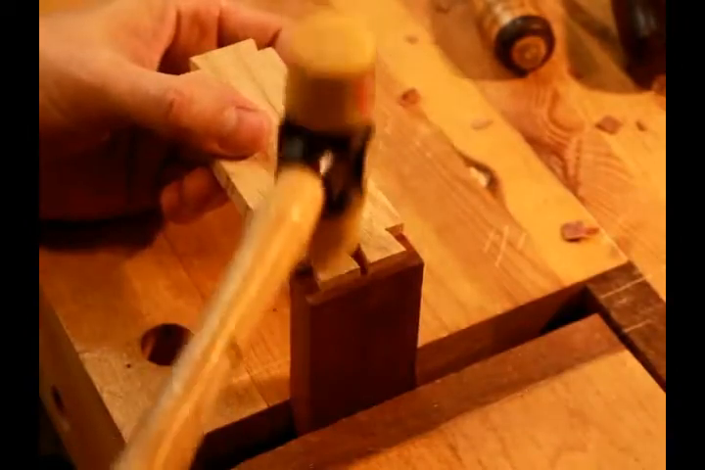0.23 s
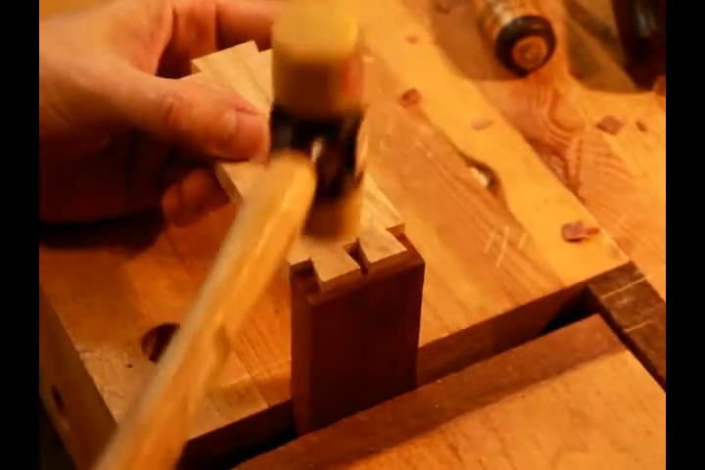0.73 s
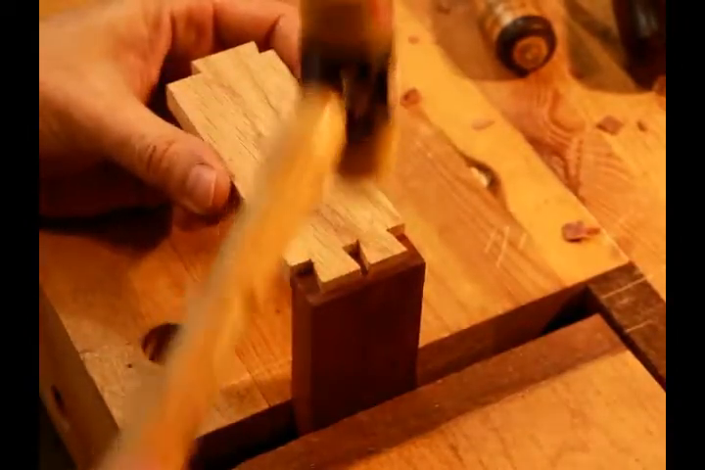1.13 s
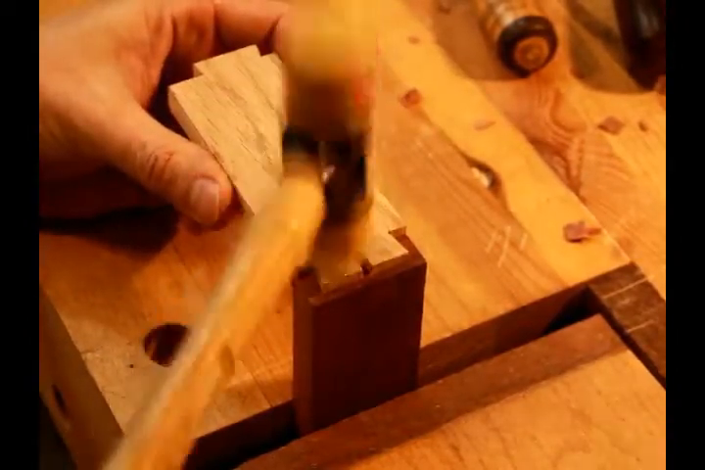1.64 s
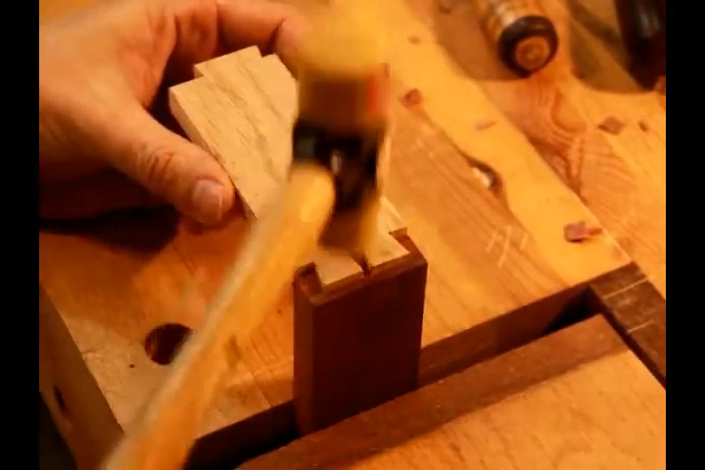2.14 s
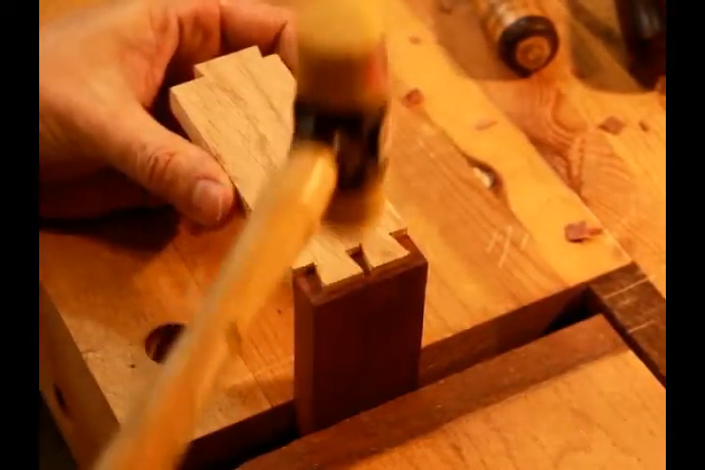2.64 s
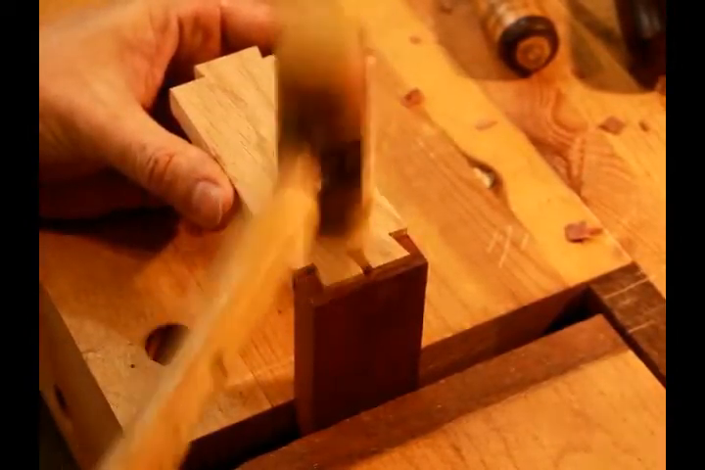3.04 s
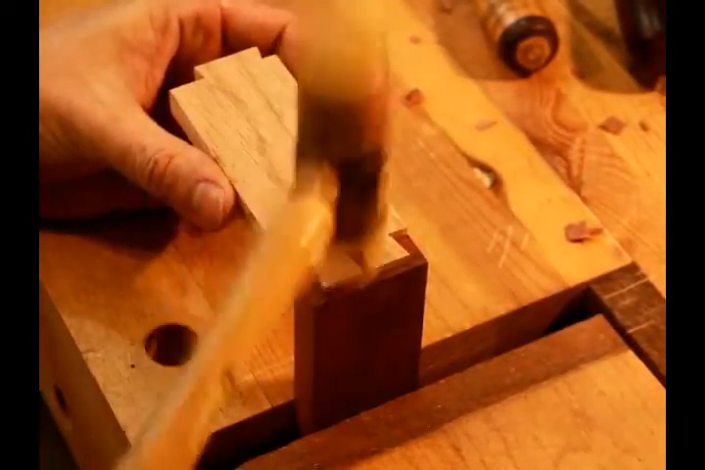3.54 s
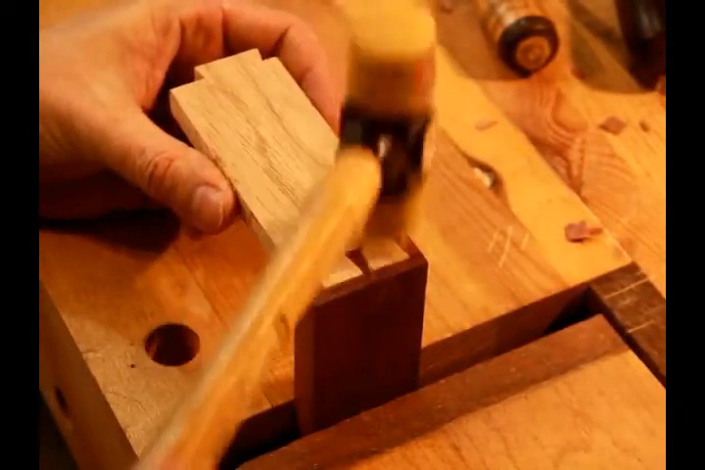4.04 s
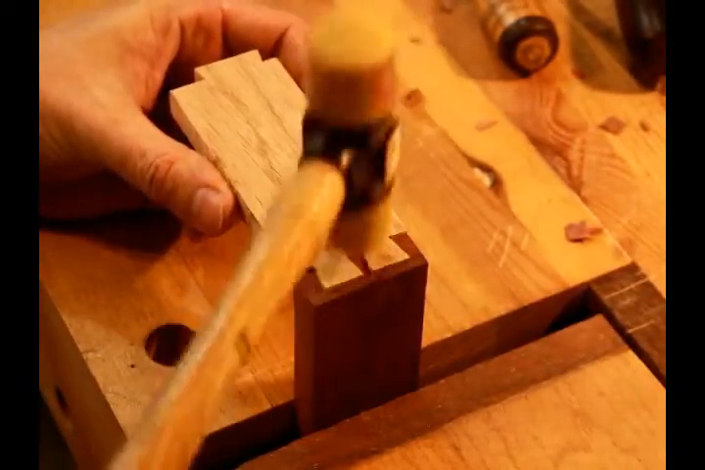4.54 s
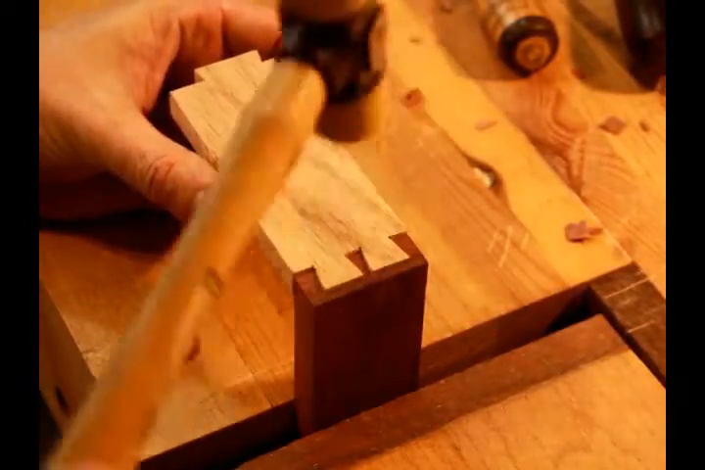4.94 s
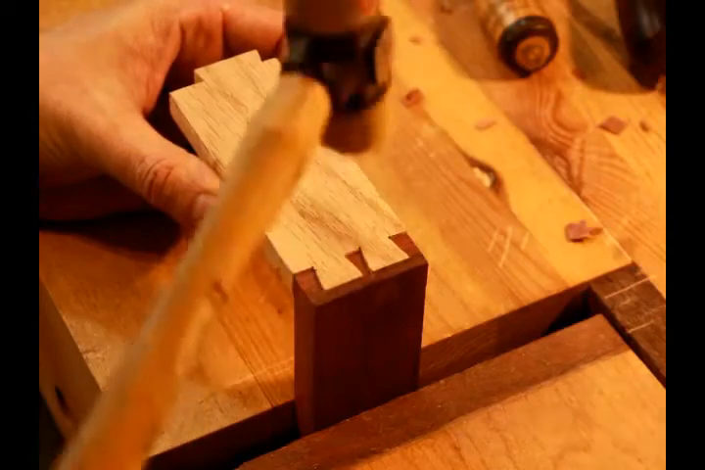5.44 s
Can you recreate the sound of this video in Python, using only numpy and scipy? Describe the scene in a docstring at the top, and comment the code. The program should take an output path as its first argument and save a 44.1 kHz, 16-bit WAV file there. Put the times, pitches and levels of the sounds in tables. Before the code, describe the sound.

Steady mallet taps on wood, about four a second, start light and get harder, with a bench thud and a short room echo.

```python
"""Over a faint room hush, a small mallet taps at a dovetail joint, about four blows a second.
Each blow cracks on the board, rings it briefly and shakes the workbench through the vice;
a small workshop answers every one with the same short, dense echo.
The taps start light and grow firmer. As the joint tightens, it damps the board's twisting ring
and passes more of the knock on to the bench; this peaks at 3.5 s, then eases."""
import sys
import numpy as np
from scipy import signal
from scipy.fft import rfft, irfft
from scipy.io import wavfile
from scipy.ndimage import uniform_filter1d

SR = 44100
rng = np.random.default_rng(int(sys.argv[2]) if len(sys.argv) > 2 else 0)


def materialize(psi):
    """Save the field psi as 16-bit PCM at rate SR to the path in sys.argv[1].

    A 1-D psi becomes a single channel; in a 2-D psi each row is a channel.
    """
    bounded = np.clip(np.atleast_2d(psi).T, -1, 1)
    quanta = np.round(bounded * 32767).astype(np.int16)
    wavfile.write(sys.argv[1], SR, quanta)


N = 251370


def from_db(db):
    """Decibels to gain."""
    return 10 ** (np.asarray(db) / 20)


def curve_at(points, hz):
    """Reads a curve of (Hz, value) points, joined by straight lines over log frequency."""
    point_hz, value = np.transpose(points)
    return np.interp(np.log(hz + 1), np.log(point_hz + 1), value)


def unit_energy(sound):
    """Scales a sound to energy 1."""
    return sound / np.linalg.norm(sound)


def smooth_noise(count, span):
    """A random curve of standard deviation 1, smoothed twice over span points."""
    curve = uniform_filter1d(uniform_filter1d(rng.standard_normal(count), span), span)
    return curve / curve.std()


def minimum_phase(gain):
    """The spectrum of the quickest pulse that has this gain at each frequency."""
    mirrored = np.r_[gain, gain[-2:0:-1]]
    log_gain = np.log(np.maximum(mirrored, from_db(-100)))
    return np.exp(np.conj(signal.hilbert(log_gain)))[:len(gain)]


def add(mix, start_s, sound):
    """Mixes in a sound, which may have begun before time zero."""
    start = round(start_s * SR)
    sound = sound[max(-start, 0):]
    part = mix[max(start, 0):][:len(sound)]
    part += sound[:len(part)]


def room_hush(level_db=-86):
    """A faint, steady bed of room noise, mostly bass."""
    # The colour of the hush. Each row: frequency in Hz, relative level in dB.
    colour = [(20, -20.5), (60, 10.5), (150, -5), (400, -26), (1000, -17.5), (4000, -35.5), (16000, -23.5)]
    gain = from_db(curve_at(colour, np.fft.rfftfreq(N, 1 / SR)))
    noise = irfft(rfft(rng.standard_normal(N)) * gain, N)
    return from_db(level_db) * noise / noise.std()


def mallet_crack(crack_db, tilt_db, modes, ripple_db=1.8, lag_s=0.00053, scatter_s=0.0006, size=2048):
    """Mallet meets board: a broad crack plus hand-damped modes, smeared over about a millisecond."""
    # The colour of the bare contact. Each row: frequency in Hz, relative level in dB.
    colour = [(30, -18), (120, -14.5), (210, 1.5), (390, 4), (650, 3), (1000, -5.5), (1600, 0.5),
              (2300, -6), (3300, -7), (4500, -8.5), (6500, -8.5), (9000, -20), (12000, -23.5),
              (15000, -34.5)]
    hz = np.fft.rfftfreq(size, 1 / SR)
    octaves = np.log2(np.maximum(hz, 1000) / 4000)  # the tilt pivots at 4 kHz, flat below 1 kHz
    ripple = ripple_db * smooth_noise(len(hz), 12)  # many small resonances shift with the landing spot
    power = from_db(curve_at(colour, hz) + crack_db + tilt_db * octaves + ripple) ** 2
    for centre_hz, width_hz, db in modes:
        power += from_db(db) ** 2 / (1 + (1.585 * (hz - centre_hz) / width_hz) ** 2) ** 2
    # Fibres give way unevenly, so each frequency leaves at its own moment.
    delay_s = lag_s + scatter_s * np.tanh(2 * smooth_noise(len(hz), 30))
    scatter = np.exp(-2j * np.pi * np.cumsum(delay_s) * hz[1])
    crack = irfft(minimum_phase(np.sqrt(power)) * scatter)
    return np.fft.fftshift(crack)  # the hit sits mid-buffer


def wood_ring(tightness, force_db, tilt_db, bend_db, bend_hz, mallet_db, spot_db=1.5):
    """The modes one blow wakes in board and mallet. Each row: pitch in Hz, width in Hz, level in dB."""
    # The board's steady modes. Each row: pitch in Hz, width in Hz, base level in dB,
    # dB gained per dB of force, dB gained per dB of bending.
    board_modes = [(1035, 230, -6.5, -0.43, 0.4758), (1850, 315, -5, 0.3, .5), (4256, 340, 6.5, 1, -0.12),
                   (6700, 950, -12, .5, .5), (9640, 550, -12.5, 1.2, 0.67), (12100, 2200, -11.5, 3.5, .1)]
    # The landing spot changes how strongly each one answers.
    steady = [(hz, width, db + by_force * force_db + by_bend * bend_db + spot_db * rng.standard_normal())
              for hz, width, db, by_force, by_bend in board_modes]
    bending = (bend_hz, 330, bend_db)
    # A sharp blow also twists the board, about an octave up; a tighter joint damps that ring.
    twist_db = -3 + 5 * tilt_db + 0.63 * bend_db - 19.5 * tightness
    twisting = (2.05 * bend_hz, 866, twist_db)
    mallet_head = (8090, 810, mallet_db)
    return [bending, twisting, mallet_head] + steady


def bench_shake(tightness, force_db, tilt_db, rise_s=0.0016, split_hz=560):
    """The heavy bench swells into its modes: a thud from the low ones, a knock from the upper ones."""
    # Modes of the bench and clamped board. Each row: pitch in Hz, relative level in dB, T60 in seconds.
    bench_modes = [(80, -1, 0.3), (99, -5, 0.41), (153, 13, 0.36), (178, 2, 0.31), (205, 9, 0.34),
                   (250, 13, 0.41), (273, 22, 0.23), (294, 13, 0.3), (307, -2, 0.48), (339, 25, 0.28),
                   (374, 11, 0.29), (404, 17, 0.26), (439, 9, 0.46), (470, 26, 0.07), (487, 16, 0.27),
                   (500, 0, 0.46), (521, 17, 0.32), (550, 3, 0.36), (576, 8, 0.35), (600, 9, 0.28),
                   (668, 20, 0.17), (703, 0, 0.43), (742, 8, 0.39), (770, 16, 0.18), (832, 11, 0.25),
                   (866, 9, 0.27), (908, -1, 0.52), (947, 15, 0.23), (994, 11, 0.25), (1026, 1, 0.35)]
    # Firm blows bring out the upper modes. Each row: force in dB, base knock level in dB.
    knock_by_force = [(-19, -25.5), (-2.5, -19.5), (-7, -13.5), (1, -6.5), (-1.5, -4.5), (2.5, -3.5)]
    t = np.arange(SR // 2) / SR
    hz, db, t60 = np.transpose(bench_modes)[:, :, None]
    polarity = (-1) ** np.arange(len(hz))[:, None]  # neighbouring modes swing in opposite directions
    spot_db = rng.standard_normal(hz.shape)  # no two blows land on quite the same spot
    envelope = (1 - np.exp(-t / rise_s)) * np.exp(-np.log(1000) * t / t60)
    modes = polarity * from_db(db + spot_db) * envelope * np.sin(2 * np.pi * hz * t)
    low = hz[:, 0] < split_hz
    thud = from_db(force_db + 0.15) * unit_energy(modes[low].sum(0))
    # A tighter joint and a square, dull blow pass more of the knock on to the bench.
    knock_db = np.interp(force_db, *np.transpose(knock_by_force)) + 5.5 * tightness - 0.7 * tilt_db - 2
    knock = from_db(knock_db) * unit_energy(modes[~low].sum(0))
    return thud + knock


def workshop_echo(nearest_wall_s=0.0035, swell_s=0.0017, frame=256):
    """The room's response: direct sound, a short lull, then dense reflections whose treble dies first."""
    # The wet/dry balance. Each row: frequency in Hz, echo level over the direct sound in dB.
    wet_db = [(100, 30), (400, 18.5), (1100, 5), (2000, 9), (2600, -1), (3300, 9), (4400, -0.5),
              (6800, 3.5), (7600, -5.5), (8600, -8.5), (10000, 3.5), (15000, 9)]
    # How long the room rings. Each row: frequency in Hz, T60 in seconds.
    decay_times = [(100, 0.33), (400, 0.33), (1000, 0.28), (2500, 0.28), (5000, 0.27), (9000, 0.24),
                   (15000, 0.17)]
    count = SR // 2
    hz, t, bands = signal.stft(rng.standard_normal(count), SR, nperseg=frame)
    bands *= np.exp(-np.log(1000) * t / curve_at(decay_times, hz)[:, None])
    band_energy = uniform_filter1d((abs(bands) ** 2).sum(1), size=3)
    tail = signal.istft(bands / np.sqrt(band_energy)[:, None], SR, nperseg=frame)[1][:count]
    swell = np.clip((np.arange(count) / SR - nearest_wall_s) / swell_s + 1, 0.2, 1)
    tail = unit_energy(tail * swell)
    # Direct path and echo share the energy at each frequency.
    wet_ratio = from_db(curve_at(wet_db, np.fft.rfftfreq(SR, 1 / SR)))
    direct = 1 / np.hypot(1, wet_ratio)
    return irfft(minimum_phase(direct) + rfft(tail, SR) * minimum_phase(direct * wet_ratio))[:count]


def scene():
    """The blows all fall in one place, so their cracks share one echo; the bench is layered in dry."""
    # The mallet blows. Each row: time in seconds, force in dB, crack gain in dB, crack tilt in dB per
    # octave, bending level in dB, bending pitch in Hz (it moves as the grip shifts), mallet ring in dB.
    blows = [(-0.0452, -16, -14, -3.3, -11, 2450, -23), (0.1979, -16, -7, -1.5, 2.5, 2330, -22),
             (0.4401, -14, -7.5, -2.4, 2.5, 2360, -12.5), (0.679, -11, -1, .5, 0.5, 2400, -20),
             (0.9206, -8, 1, 1.62, 1, 2490, -2), (1.1614, -15.5, 0, 0.66, 7.5, 2220, 2),
             (1.395, -10.5, 1.5, 1.42, 5, 2480, -3), (1.6271, -6.5, 2, 1.66, 3.5, 2470, -8),
             (1.8621, -7, 1.5, 0.4, 5.5, 2570, -10), (2.0913, -7, 5, 1.2, 5, 2420, -5),
             (2.329, -5, 5, 1.56, -4, 2550, -3.5), (2.5607, -6.5, 4, .5, 7, 2380, -11.5),
             (2.7918, -3, 5.5, 1.75, -6, 2600, 3), (3.0341, -2.5, 2.5, 0.7, 3.5, 2650, -9.5),
             (3.2867, -1.5, 3, 0, 4.5, 2670, 6), (3.5306, -2, 6.5, 0.1, 14, 2550, -1),
             (3.7776, -2.3, -0.5, -3.3, 6.5, 2580, 3.5), (4.031, -8, 0, 1.4, 15, 2534, -1.5),
             (4.2787, -6.5, 1, 0.17, 11, 2600, 3.5), (4.5283, -3, 4, 2.17, 8.5, 2500, -1.5),
             (4.7849, -2.5, 4.5, 1, -2, 2630, -5), (5.0331, -2, 5.5, 0.5, 7, 2690, -7),
             (5.2819, -1, 3, -0.5, 9.5, 2710, 3), (5.531, -1, -0.5, -3.9, 11.5, 2700, 3)]
    # How much the twisting ring is damped and the bench knock boosted: rises to 3.5 s, then eases.
    # Each row: time in seconds, tightness of the joint (0 is loose).
    tightness_curve = [(0, 0.032), (2.5, 0.1), (3.5, 0.53), (5.1, 0.35)]
    room = workshop_echo()
    mix = room_hush()
    for hit_s, force_db, crack_db, tilt_db, bend_db, bend_hz, mallet_db in blows:
        tightness = np.interp(hit_s, *np.transpose(tightness_curve))
        modes = wood_ring(tightness, force_db, tilt_db, bend_db, bend_hz, mallet_db)
        crack = mallet_crack(crack_db, tilt_db, modes)
        add(mix, hit_s - len(crack) / 2 / SR, signal.fftconvolve(crack, room))
        add(mix, hit_s, bench_shake(tightness, force_db, tilt_db))
    return mix[None]


def record(dry, bass_hz=35, top_hz=15950):
    """The microphone rolls off the deep bass, and a steep low-pass trims the very top."""
    thinned = signal.lfilter(*signal.butter(1, bass_hz, "high", fs=SR), dry)
    low_pass = signal.firwin(255, top_hz, window=("kaiser", 9), fs=SR)
    return signal.oaconvolve(thinned, low_pass[None], "same")


dry = scene()
out = record(dry)
materialize(out)
```